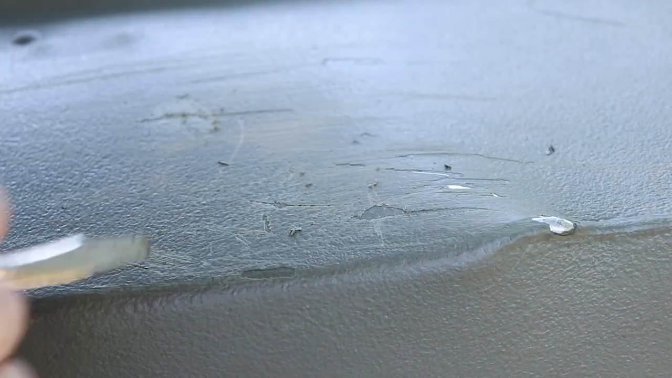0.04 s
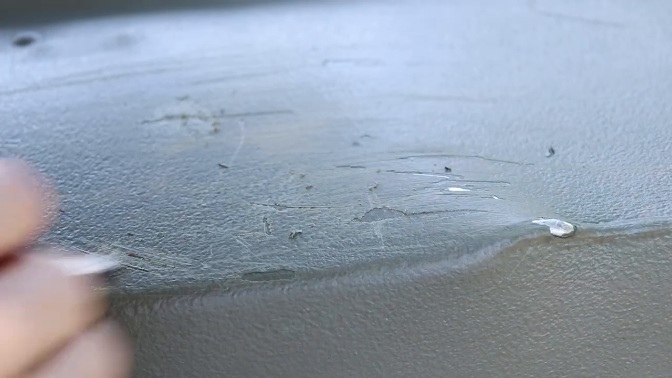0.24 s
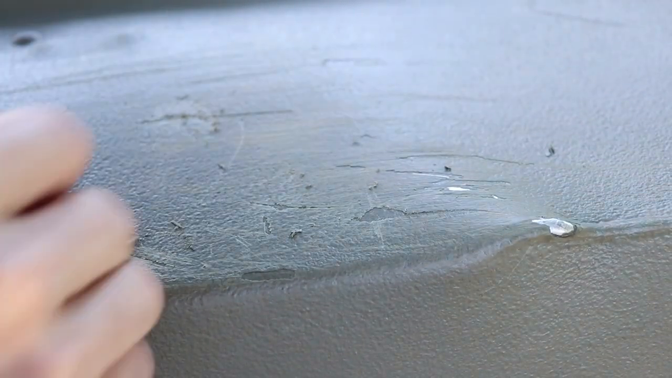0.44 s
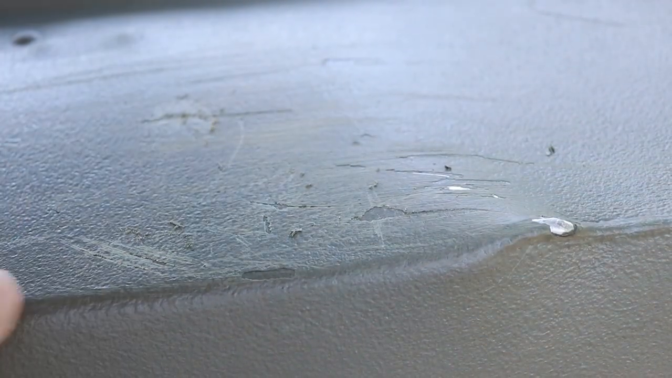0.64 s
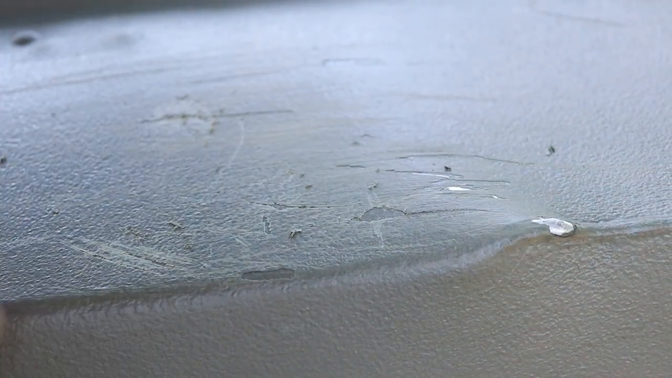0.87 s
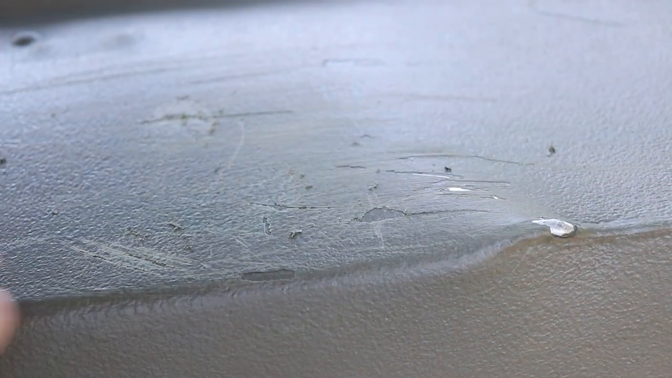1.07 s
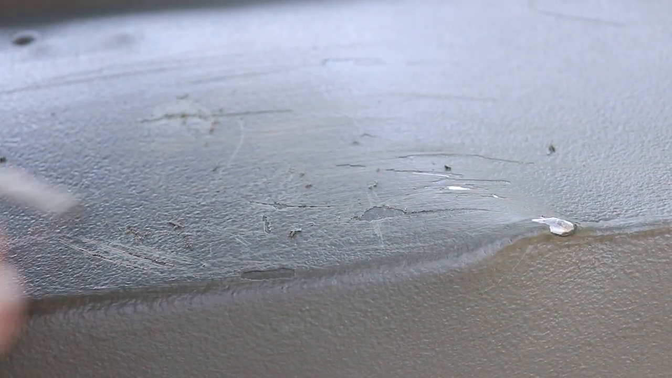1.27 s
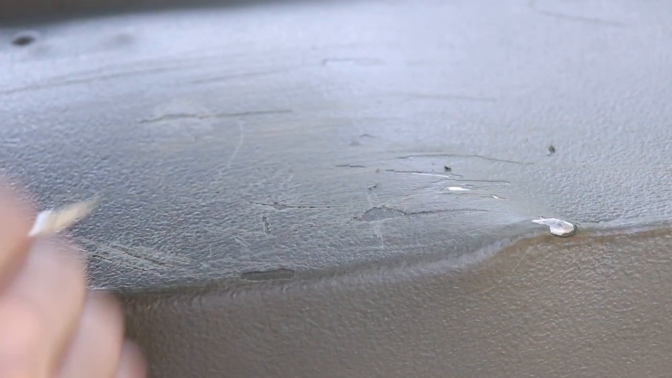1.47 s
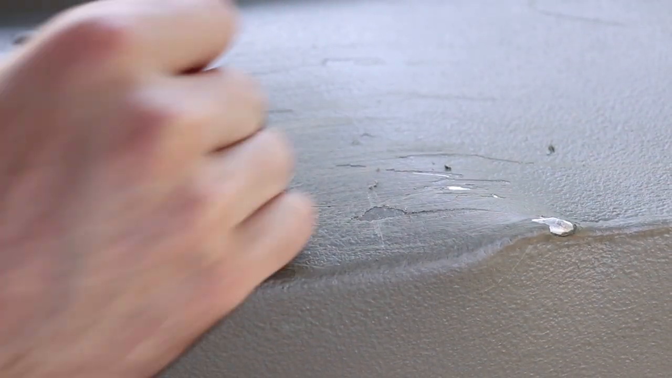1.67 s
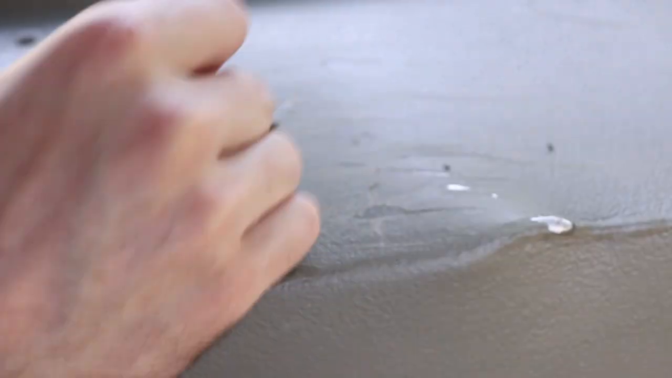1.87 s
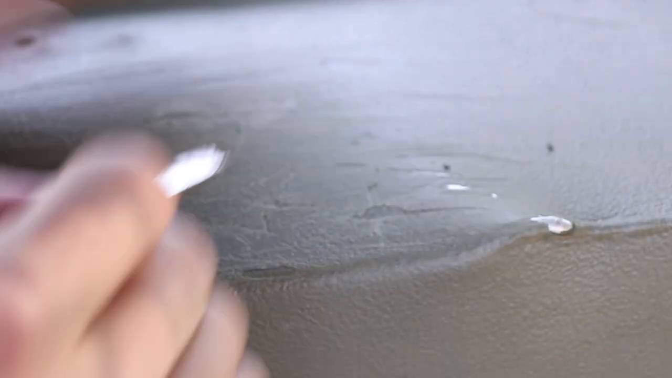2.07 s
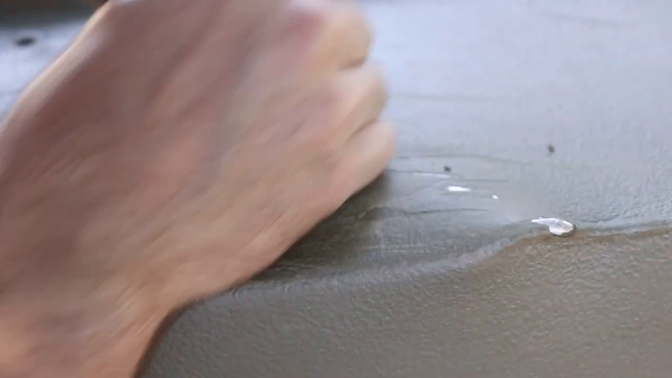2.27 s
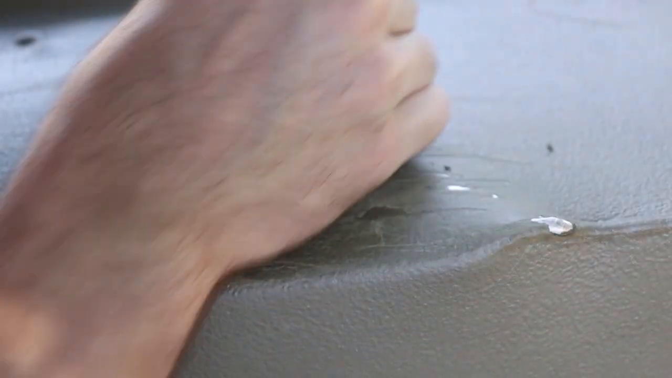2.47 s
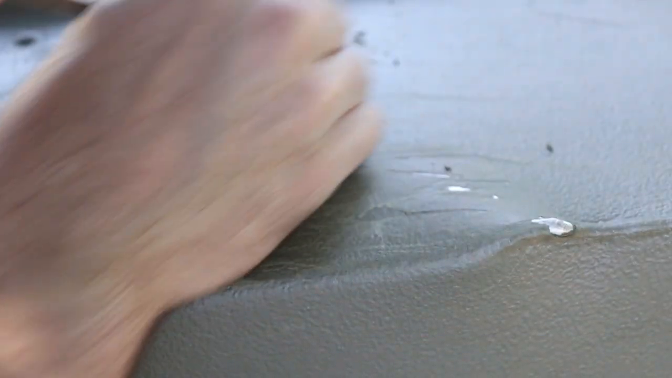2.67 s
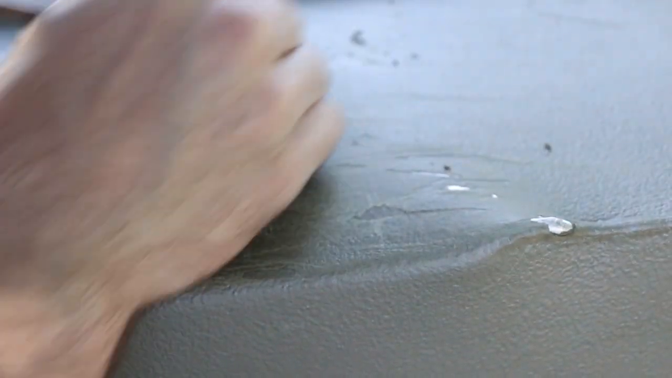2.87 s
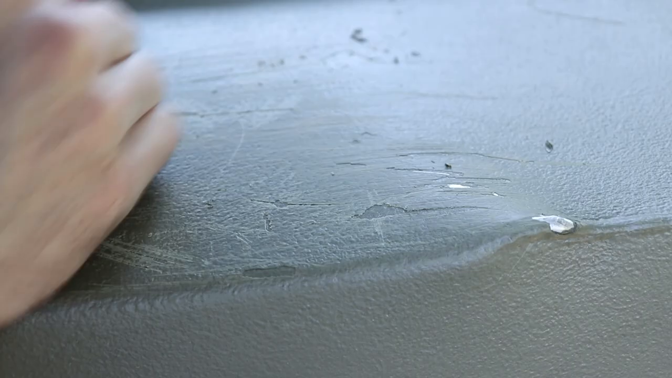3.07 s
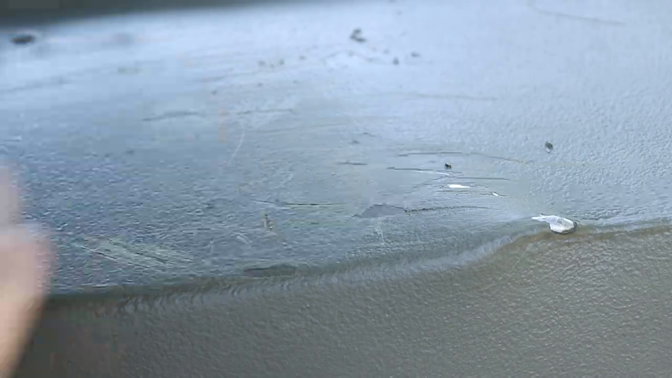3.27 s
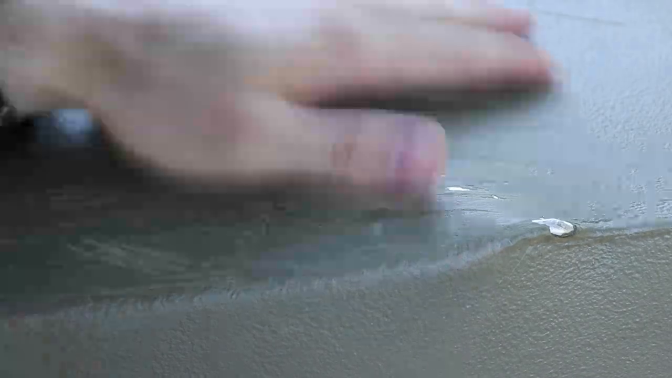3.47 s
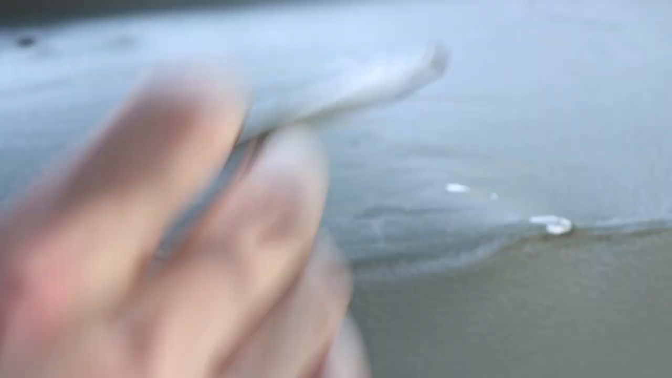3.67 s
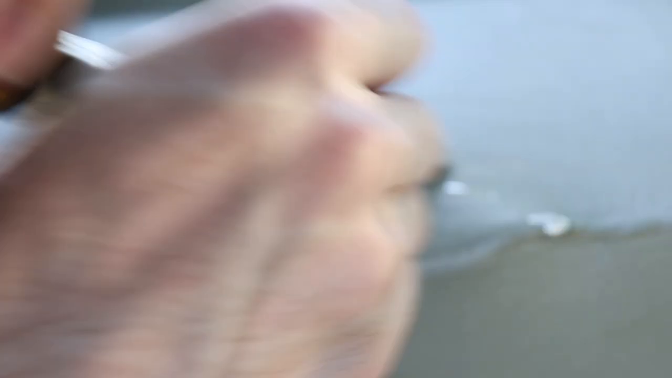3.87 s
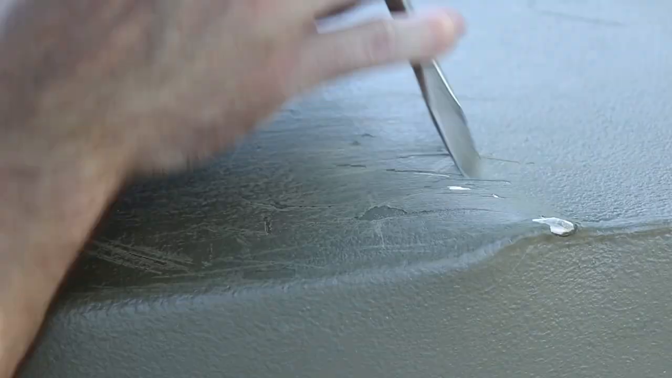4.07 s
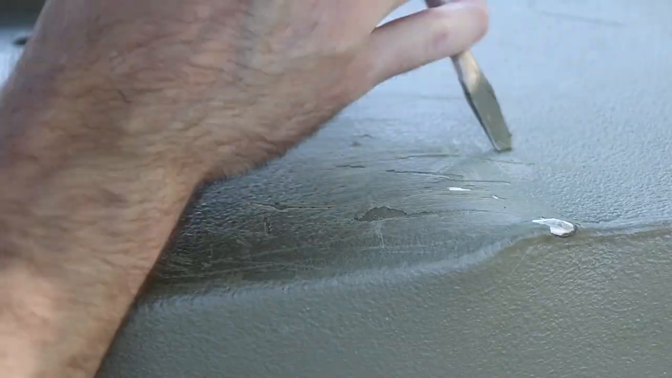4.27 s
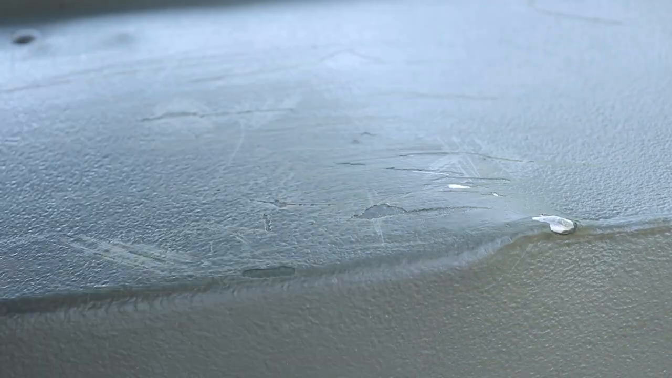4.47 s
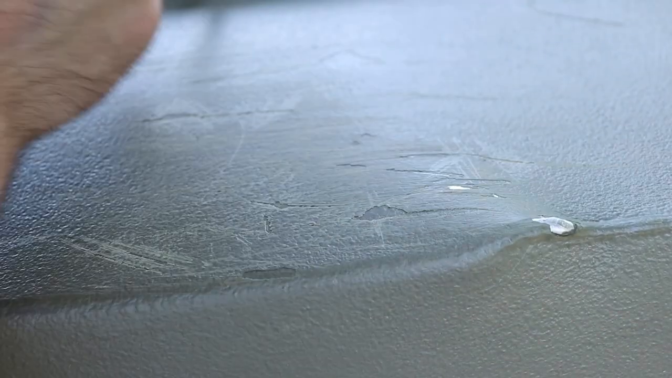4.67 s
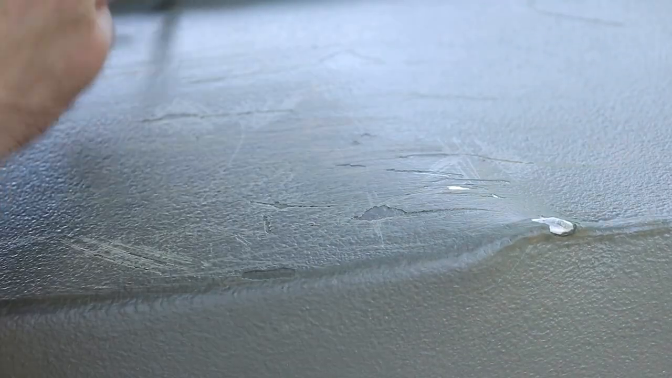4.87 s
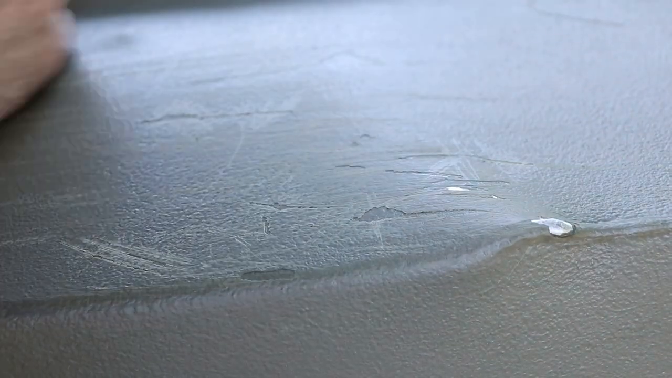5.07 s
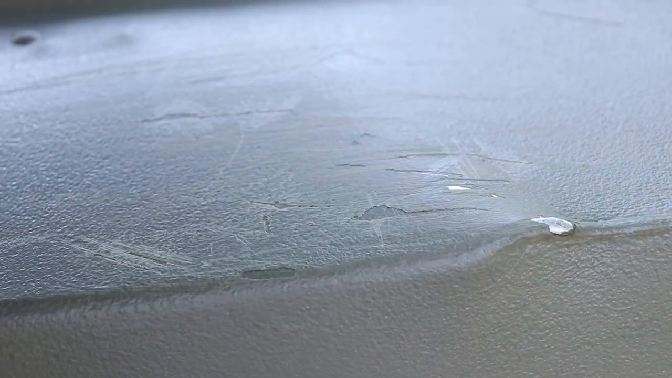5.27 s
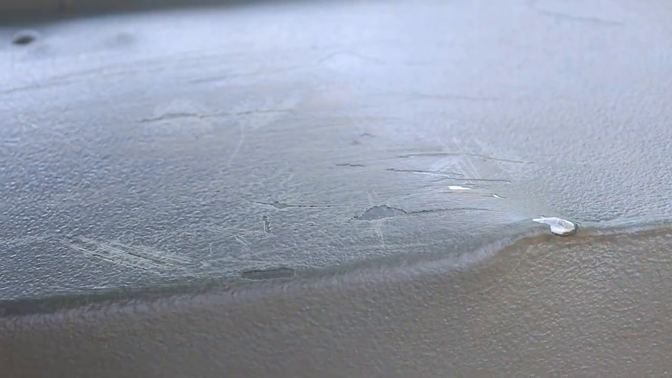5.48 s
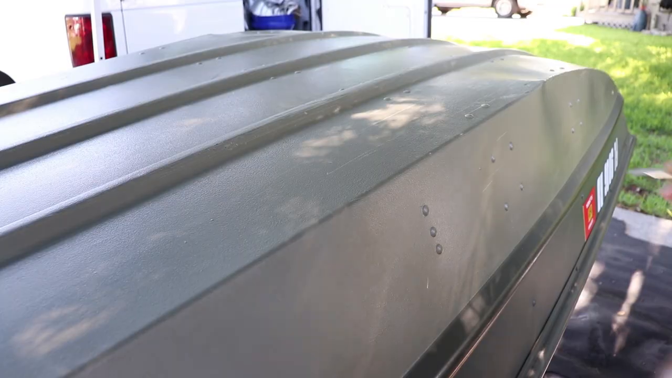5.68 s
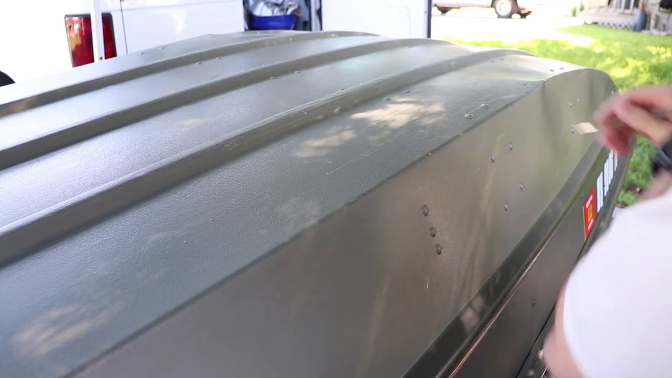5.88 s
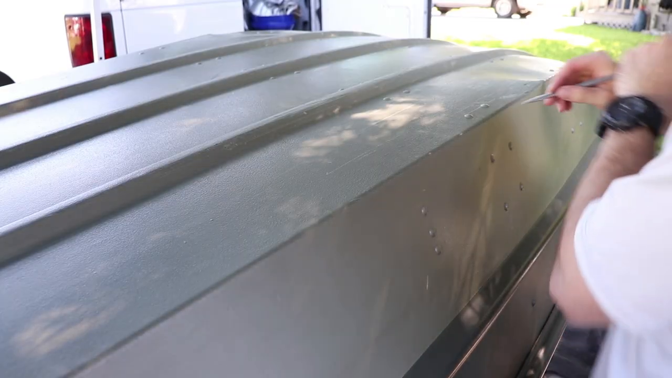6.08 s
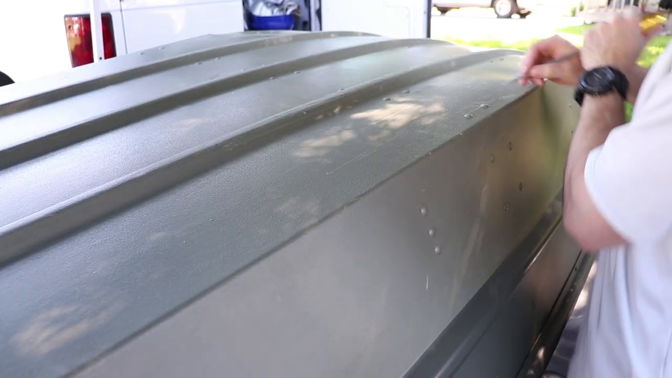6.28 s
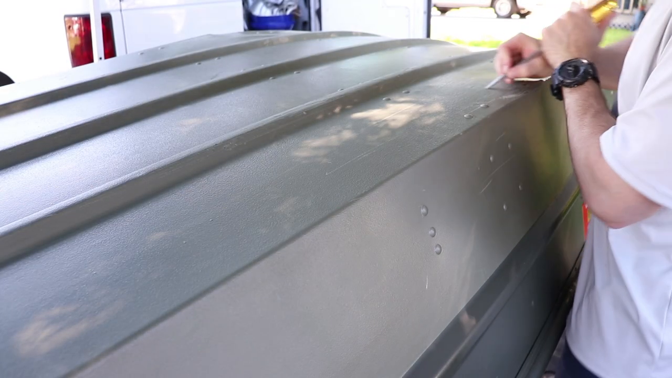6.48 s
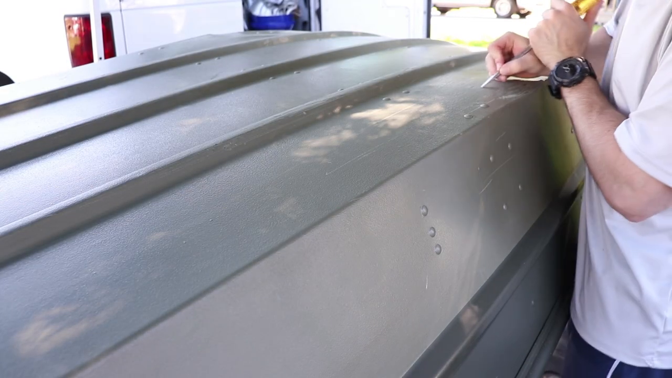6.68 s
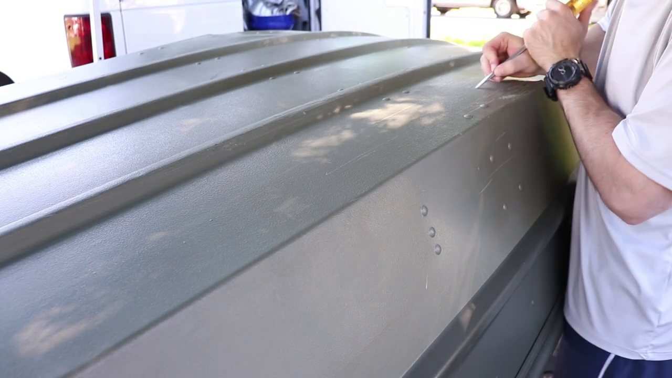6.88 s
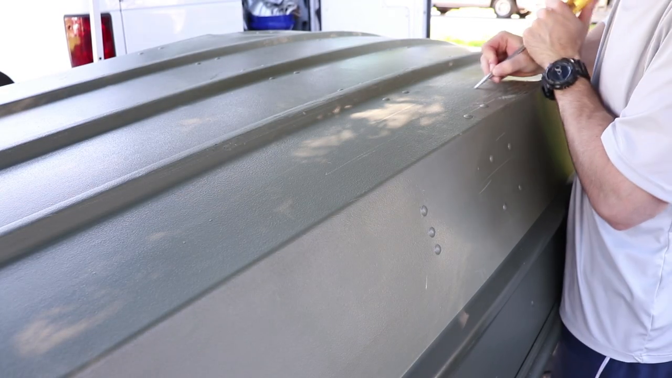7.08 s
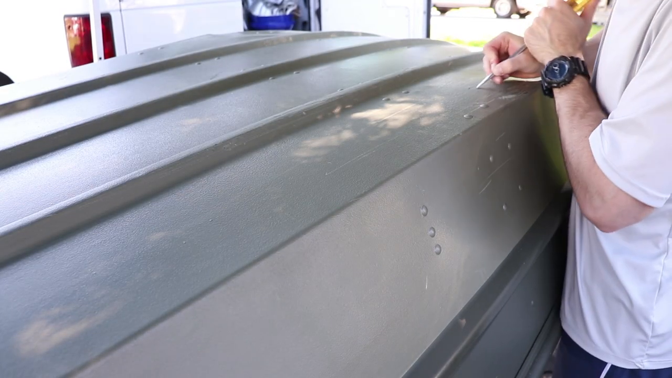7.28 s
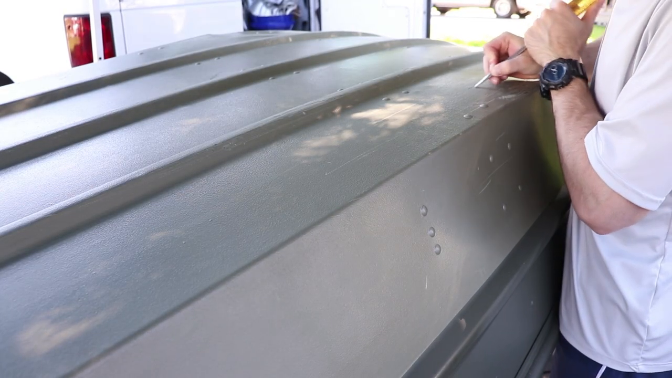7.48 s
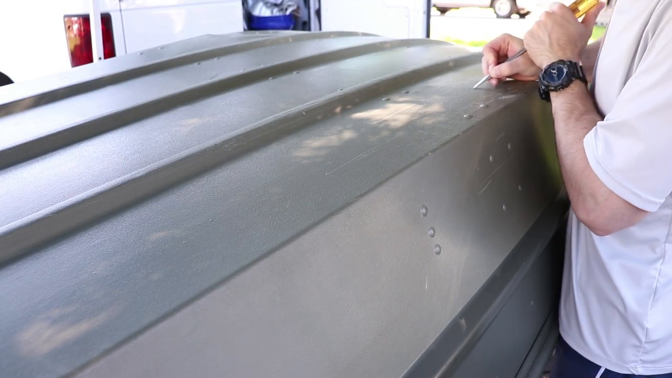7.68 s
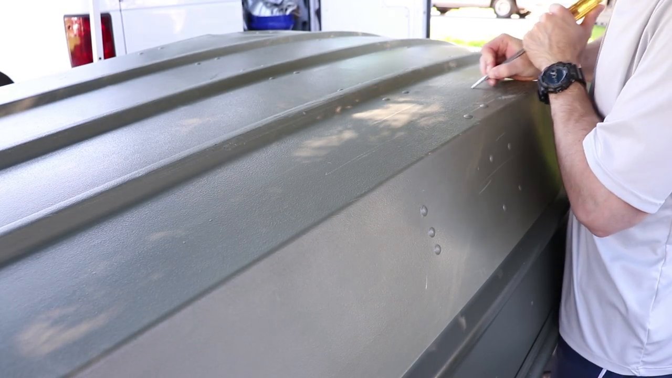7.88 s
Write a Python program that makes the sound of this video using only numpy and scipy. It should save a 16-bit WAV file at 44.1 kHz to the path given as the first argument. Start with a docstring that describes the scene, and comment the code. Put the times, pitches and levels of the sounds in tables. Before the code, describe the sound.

Close beside an upturned aluminium boat, a screwdriver blade gives a few light scrapes and rattles, pauses, then scrapes back and forth about five times a second, gritty with hollow thuds and snapping flakes. The view shifts to the far end: dry shuffles and clicks, a sharp knock, a long skating sweep, then strong booming strokes. Quiet outdoor air, a distant machine hum and faint birds lie behind, in mono.

```python
"""A flat screwdriver scrapes old coating off an upturned aluminium boat, back and forth about five times a second:
stick-slip noise at the tip drives the resonances of the thin hull. Thuds, landings and snapping flakes strike it too.
Heard first beside the spot, then, after shuffling and one long sweep, from the far end of the boat.
Behind it are dry handling noises (noise bursts with a yard echo), outdoor air (shaped noise), a distant machine
(wavering sines) and faint birds (blurred gliding sines)."""
import sys
import numpy as np
from scipy import signal
from scipy.fft import rfft, irfft
from scipy.io import wavfile

SR = 44100
rng = np.random.default_rng(int(sys.argv[2]) if len(sys.argv) > 2 else 0)


def transcribe(u):
    """Save the signal u as a 16-bit wav file named by the first command-line argument.

    u: samples, shape (n,) or (channels, n), limited to [-1, 1]; the rate is SR.
    q: integer samples, one column per channel.
    """
    v = np.clip(np.atleast_2d(u).T, -1, 1)
    q = np.round(v * 32767).astype(np.int16)
    wavfile.write(sys.argv[1], SR, q)


N = 350154  # length in samples

SIZE = 32768  # samples in one event or response
FREQ = np.maximum(np.arange(SIZE // 2 + 1) * SR / SIZE, 1)  # Hz
TIME = np.arange(SIZE) / SR  # s
SHIFT_S, MOVE_S = 1.85, 5.612  # the tip moves to a second patch; the listening place moves to the far end
# force spectrum of breaking flakes: [f/Hz, relative level/dB]
GRIT_SPECTRUM = [(200, -11), (1000, 9), (2800, 0.5), (4000, -1), (6000, -4), (8000, -3), (10500, -9),
                 (14000, -6.5), (16000, -15)]


def scraping():
    """Source and resonator: all strokes and blows excite the part of the hull that the tip is on."""
    # hull resonances at the first patch, the second patch and the far end:
    # [f/Hz, bandwidth/Hz, level over the plain sheet/dB]
    first_modes = [(155, 9, 16), (247.7, 29, 20), (351, 32, 8.5), (662, 66, 18), (764, 39, 15.5),
                   (950, 96, 2.5), (1454, 58, 13), (1605, 31, 10.5), (1820, 83, 8), (2220, 58, 7),
                   (2680, 320, 11.5), (3300, 90, -1), (5400, 850, 3.5), (7960, 900, 3)]
    near_modes = [(144.1, 3.9, 21.6), (244, 5.4, 20.3), (246, 38.5, 18.7), (293, 11, 0.33), (347, 40, 7.6),
                  (461, 145, 11.2), (533, 28, 3.5), (462.2, 8.1, 15.3), (632, 86, 14.3), (738.5, 16, 20.7),
                  (740, 6.3, 1), (930, 8.8, 0.98), (1196, 150, 5.4), (1350, 37, 2.8), (1449, 36, 9.2),
                  (1565, 48, 9.3), (1720, 270, 7.9), (1810, 31, 1.4), (2207, 49, 9.6), (2517, 93, 12),
                  (2780, 64, 13), (3270, 190, 7.4), (3480, 15, 6.9), (4540, 280, 3.8), (5700, 230, 9.3),
                  (7980, 900, 6.3), (9200, 220, 1.4)]
    far_modes = [(235, 21.5, 10), (352.6, 18, 9.1), (428, 22, 10.2), (640, 110, 10.6), (780, 46, 5.9),
                 (830, 23, 2.5), (917, 26, 7.9), (1130, 99, 5), (1390, 51, 4.1), (1680, 11, 2.9),
                 (1845, 25, 5.9), (2200, 44, 3.8), (2480, 100, 4.9), (2896, 80, 5), (3760, 950, 1.6),
                 (8570, 240, 9.1), (13600, 1100, 2.6)]
    # reverberant ring of the hull, beside the tool and at the far end: [f/Hz, T60/s, level over the first wave/dB]
    near_ring = [(129, 0.21, 5.5), (248, 0.65, -7), (696, 0.21, -1), (1800, 0.15, -3), (4780, 0.14, -9.5),
                 (12800, 0.042, -19)]
    far_ring = [(128, 0.5, 3.5), (252, 0.36, -4), (670, 0.32, -6.5), (1800, 0.17, -0.5), (4900, 0.25, -7),
                (13000, 0.047, -21)]
    first = hull(first_modes, near_ring)
    near = hull(near_modes, near_ring)
    far = hull(far_modes, far_ring)

    def body(s):
        """The transfer function of the hull depends on the place, hence on the time."""
        if s < SHIFT_S:
            return first
        return near if s < MOVE_S else far

    return to_and_fro(body) + chips(body) + catches(body) + taps(body)


def to_and_fro(body):
    """Reciprocating friction: each push is followed by a thinner return; now and then the blade skids freely."""
    # the hand's to and fro, one row per push and its return; about -40 dB is lifted clear:
    # [t of deepest bite/s, push length/s, push pressure/dB, return pressure/dB, push chatter f/Hz, return chatter f/Hz]
    stroke_rows = [(0.166, 0.1, -8, -20, 910, 1200), (0.333, 0.082, -6.5, -41, 1050, 1400),
                   (1.022, 0.11, -16, -19.5, 1200, 1490), (1.36, 0.13, -19, -15, 1410, 1400),
                   (1.589, 0.095, -10, -31, 1100, 1800), (1.767, 0.07, -20.5, -45, 1390, 1780),
                   (1.99, 0.047, -11.5, -17, 1200, 1990), (2.229, 0.095, 1, -9, 1000, 1290),
                   (2.442, 0.085, -1, -6, 910, 1070), (2.628, 0.065, -3, -18.5, 800, 1500),
                   (2.812, 0.036, 0, -16, 810, 1400), (3.01, 0.073, 2.5, -16, 755, 1300),
                   (3.239, 0.064, 1.5, -17, 780, 1400), (3.536, 0.047, -4, -11, 690, 1200),
                   (3.738, 0.097, -4.5, -11, 870, 1090), (3.945, 0.083, 0.5, -3.5, 750, 1120),
                   (4.183, 0.091, 1, 0, 726, 1010), (4.415, 0.1, 1.5, 2, 660, 930),
                   (4.617, 0.084, 5, 0, 530, 1020), (4.835, .105, 5, 3, 437, 920),
                   (5.052, 0.081, 5.5, -3, 510, 1000), (5.245, 0.092, 4.5, -3, 520, 1010),
                   (5.453, 0.073, 5, 2, 527, 835), (6.853, 0.099, 5.5, -8, 650, 1000),
                   (7.055, 0.089, 6.5, 1, 560, 940), (7.245, 0.073, 10, 1, 540, 950),
                   (7.447, 0.076, 9.5, -1.5, 545, 950), (7.655, .06, 13.5, 5.5, 505, 700),
                   (7.852, 0.08, 6, 5.5, 540, 757)]
    # free skids: the blade rattles after landing; later one long sweep digs in and skates on brighter:
    # [t of peak/s, lead-in/s, run-out/s, sheet flex level/dB, chatter level/dB, chatter f/Hz, grit level/dB]
    skid_rows = [(0.435, .012, 0.015, -45, -33.5, 1480, -50), (0.472, .012, 0.027, -45, -42, 1090, -52),
                 (0.532, .028, 0.033, -37, -33.5, 1300, -51.5), (6.68, 0.16, 0.19, -23, -21.5, 1000, -35.5),
                 (6.79, 0.24, 0.16, -38, -26, 1800, -46)]
    lead_share = 0.57  # part of a stroke before its deepest bite
    return_share = 0.53  # place of the return in the cycle
    return_fill, return_max_s = 0.8, 0.11  # share of the time left by the push that the return lasts; its limit
    jab_s, lift_s = 0.064, 0.07  # a shorter push is a jab; the tip then stays in the air this long
    cycle_s, rest_s = 0.18, 0.27  # the last to and fro before a rest; a longer gap is a rest
    return_cut_hz = 405  # the trailing tip hardly bends the sheet

    out = np.zeros(N)
    trailing = causal(1 / np.sqrt(1 + (return_cut_hz / FREQ) ** 4))
    gaps = np.diff([row[0] for row in stroke_rows], append=np.inf)
    for (s, push_s, push_db, return_db, push_hz, return_hz), gap in zip(stroke_rows, gaps):
        cycle = gap if gap < rest_s else cycle_s
        push = s, push_s, push_db, push_hz, False
        back_s = min(return_fill * (cycle - push_s), return_max_s)
        # the tip springs clear after a short jab and lands late
        lifted = lift_s + lead_share * back_s if push_s < jab_s else 0
        back_at = s + max(return_share * cycle, lifted)
        back = back_at, back_s, return_db, return_hz, True
        for at, length, press_db, hz, returning in (push, back):
            lead = lead_share * length
            sheet = pressed(body(at)) * (trailing if returning else 1)
            force = bite(at, press_db, hz, returning)
            add(out, at - lead, stroke(sheet, lead, length - lead, *force))
    for s, lead, trail, *force in skid_rows:
        add(out, s - lead, stroke(body(s), lead, trail, *force))
    return out


def bite(s, press_db, chatter_hz, returning):
    """Contact force: hand pressure and coating set a stroke's flex, chatter and grit levels; its pitch is given."""
    # old paint under the tip: [t/s, coated share (0 bare metal, 1 full coat)]
    paint_rows = [(0.15, 0.29), (0.55, 0.072), (1.0, 0.69), (2.4, 0.99), (2.65, 0.68), (3.0, 0.8),
                  (3.24, 1), (3.53, 0.2), (3.75, 0.78), (4.4, 0.66), (4.65, 0.51), (5.2, 0.043),
                  (5.5, 0.57), (7.05, 0.5), (7.9, 0.43)]
    paint = np.clip(np.interp(s, *np.transpose(paint_rows)), 0, 1)
    far = s > MOVE_S
    # starting levels in dB: a push at 0 dB pressure on bare metal, beside the tool
    flex_db, chatter_db, grit_db = -27.5, -27, -46.5
    # a full coat drags harder on the sheet, muffles the chatter and sheds more grit
    flex_db += press_db + 5 * paint
    chatter_db += press_db - 14.5 * paint
    grit_db += 0.79 * press_db + 9.5 * paint  # grit grows more slowly than pressure
    # the return stroke flexes the sheet less
    flex_db += -8 * returning
    chatter_db += -1 * returning
    # from the far end the boom carries best
    chatter_db += -4 * far
    grit_db += -4.5 * far
    return flex_db, chatter_db, chatter_hz, grit_db


def stroke(body, lead, trail, *force, flex_bite=1.6, chatter_bite=1.3, grit_bite=1.2):
    """Frictional excitation: grit follows the hand's speed, flex and chatter swell where the tip digs in."""
    length = lead + trail
    depth = travel(lead, trail)
    speed = np.sin(np.pi / 2 * depth)
    judder = stick_slip(length)
    flex, chatter, grit = contact(body, *force)
    slips = grains(2500, 2.76, 0.58)
    flakes = grains(4000, 2.1, 0.68)
    chattering = rfft(slips * judder * depth ** chatter_bite) * causal(chatter)
    grinding = rfft(flakes * judder * speed ** grit_bite) * causal(grit)
    # the hand holds the tip down, so the sheet's swing follows the depth of the cut
    # and keeps an even strength while its phase wanders
    analytic = signal.hilbert(irfft(rfft(slips) * causal(flex)))
    strength = np.sqrt(np.mean(np.abs(analytic) ** 2))
    swing = np.cos(np.angle(analytic)) * strength * depth ** flex_bite
    # the swing is kept between about 85 and 650 Hz
    band = 1 / np.sqrt((1 + (FREQ / 650) ** 8) * (1 + (85 / FREQ) ** 4))
    sheet = rfft(swing) * causal(band)
    return irfft((sheet + slide(chattering + grinding, length)) * body * undb(0.71))


def travel(lead, trail):
    """Kinematic envelope: rises from 0 to 1 at the deepest bite and falls back to 0."""
    return np.interp(TIME, [0, lead, lead + trail], [0, 1, 0])


def stick_slip(length, slow_hz=200, sweep_s=0.22, uneven=0.55, spread_db=4, release_s=0.0044, creep=0.57):
    """Stick-slip: the tip breaks free at uneven intervals, more finely in a long fast sweep; rms 1."""
    gaps, sizes = rng.standard_normal((2, SIZE // 32))
    slip_hz = slow_hz * (1 + (length / sweep_s) ** 2)
    at = np.cumsum(np.exp(uneven * gaps)) * SR / slip_hz
    kick_sizes = undb(spread_db * np.clip(sizes, -2, 2))
    kicks = np.bincount(at.astype(int), kick_sizes, SIZE)[:SIZE]
    releases = signal.lfilter([1], [1, -np.exp(-1 / (release_s * SR))], kicks)
    return unit(creep + unit(releases))


def grains(rate, spread_db, smooth):
    """Granular noise: tiny slips of very uneven size (rate per second) over a smooth rub; rms 1."""
    sizes = undb(spread_db * np.minimum(rng.exponential(size=SIZE), 4))
    slips = (rng.random(SIZE) < rate / SR) * sizes * rng.choice([-1, 1], SIZE)
    return unit(unit(slips) + smooth * rng.standard_normal(SIZE))


def contact(body, flex_db, chatter_db, chatter_hz, grit_db, thud=1):
    """Contact force spectra: the sheet gives, the blade chatters, the coating cracks."""
    # force spectrum of the flexing sheet: [f/Hz, relative level/dB]
    flex_spectrum = [(30, -42.5), (60, -11.5), (100, -26.5), (145, -13), (210, -1), (300, -1.5),
                     (420, -6.5), (600, -19.5), (1200, -22.5), (4000, -82)]
    flex = through(undb(along(flex_spectrum, FREQ)) * thud, body, flex_db)
    chatter = through(bump(chatter_hz, 0.88, 2.07), body, chatter_db)
    grit = through(undb(along(GRIT_SPECTRUM, FREQ)), body, grit_db)
    return flex, chatter, grit


def slide(edge, length):
    """Moving source: the tip passes from one spot to the next, and its colour changes on the way."""
    turn = np.pi / 2 * np.clip(TIME / length, 0, 1)
    shares = np.cos(turn) ** 2, np.sin(turn) ** 2
    return rfft(sum(share * irfft(edge * spot(length)) for share in shares))


def spot(length, rib_db=-4.0, blur_s=0.24):
    """Interference: bending waves bounce off two nearby ribs; a long stroke averages the colouring out."""
    delays = rng.uniform(0.0008, 0.004, 2)  # s, group delay at 1 kHz; the lows arrive later
    echoes = sum(np.exp(-4j * np.pi * delay * np.sqrt(1000 * FREQ)) for delay in delays)
    return 1 + undb(rib_db) / (1 + (length / blur_s) ** 2) * echoes * FREQ / (FREQ + 700)


def catches(body, thud_width=0.47, thud_slope=0.88):
    """Impulsive arrest: the tip thuds at the spot's pitch, with more chatter and clank the more abruptly it stops."""
    # the tip thuds on the sheet, mostly as it catches near a push:
    # [t/s, thud level/dB, abruptness (0 to 1), chipping paint level/dB, thud f/Hz]
    thud_rows = [(0.169, -36.5, .8, -56, 300), (0.321, -33.5, .8, -47, 280), (0.944, -28.5, .5, -69, 260),
                 (1.883, -41, 0.9, -48.5, 280), (2.202, -24.5, 0.4, -42, 296), (2.436, -28, 1, -31, 330),
                 (2.625, -24, 0.89, -54, 273), (2.823, -18, 0.75, -40, 438), (3.016, -21.5, 0.73, -42, 330),
                 (3.231, -30, 0, -43, 254), (3.374, -23.5, 0, -42.5, 330), (3.5227, -26.5, 0.6, -48, 280),
                 (3.530, -20, 0.88, -27.5, 300), (3.726, -22, 0, -50, 243), (3.937, -27, 0.1, -32.5, 292),
                 (4.423, -26.5, .1, -38.5, 280), (4.803, -28, 0.8, -60, 400), (5.032, -24.5, 0.2, -38, 480),
                 (5.228, -33, 1, -39, 456), (5.251, -26.5, 0.7, -58, 500), (5.455, -26, 0.98, -31, 453),
                 (7.047, -21, 0.23, -60, 285), (7.236, -18, 0.9, -26, 280), (7.244, -19, 0.25, -23.5, 230),
                 (7.426, -26, 0.76, -54, 450), (7.452, -15.5, 0.94, -49, 300),
                 (7.628, -20.5, 0.98, -49, 360), (7.642, -12, 0.82, -35, 404), (7.742, -27.5, 1, -50, 400),
                 (7.833, -22, 0.89, -46, 286)]
    near_hz, far_hz = 467, 600  # chatter pitch of a thud, beside the tool and at the far end
    clank_db, soft_db = -40, -32  # clank of an abrupt stop; loss of chatter and clank in a soft one
    out = np.zeros(N)
    for s, db, abrupt, chip_db, thud_hz in thud_rows:
        edge_db = db + soft_db * (1 - abrupt)
        hz = near_hz if s < MOVE_S else far_hz
        thud = bump(thud_hz, thud_width, thud_slope)
        blow = knock(pressed(body(s)), db, edge_db, hz, chip_db, thud)
        add(out, s, blow + clank(edge_db + clank_db))
    return out


def taps(body):
    """Impact and damping: the more freely the landing blade bounces, the less it chatters and the more it rings."""
    # the blade lands on the hull: [t/s, blow level/dB, freedom to ring (0 to 1), chipping paint level/dB]
    landing_rows = [(0.4229, -31, 0, -34.5), (.432, -32, 0.1, -48), (.510, -35.5, 0.2, -44),
                    (0.528, -35, 0.4, -50), (.943, -32.5, 0.16, -57), (2.334, -36.5, 0.25, -42),
                    (3.64, -30.5, 1, -26.5), (3.842, -38, 0.8, -42), (4.28, -33.5, 0.95, -41),
                    (4.75, -33, 0, -60), (5.138, -30.5, 0, -59), (5.338, -27, 0, -32),
                    (6.4843, -14, 0.16, -15.5), (6.681, -18.5, 0, -43), (7.7477, -18.5, 0.2, -26)]
    tap_hz = 1160
    held_flex_db, held_clank_db = -3.5, -6.5  # with the blade held firmly
    free_flex_db, free_chatter_db, free_clank_db = 2, -3.5, 11  # change when it bounces freely
    out = np.zeros(N)
    for s, db, free, chip_db in landing_rows:
        flex_db = db + held_flex_db + free_flex_db * free
        chatter_db = db + free_chatter_db * free
        blow = knock(pressed(body(s)), flex_db, chatter_db, tap_hz, chip_db)
        add(out, s, blow + clank(db + held_clank_db + free_clank_db * free))
    return out


def chips(body):
    """Brittle fracture: a flake snaps off with a bright tick that crumbles away within milliseconds."""
    # flakes of paint snap off: [t/s, level/dB, crumbling time constant/s]
    chip_rows = [(1.9708, -41, 0.0091), (1.99, -37, 0.0032), (2.187, -40, .005), (2.203, -26.5, 0.0078),
                 (2.241, -45, .01), (2.332, -32.5, .003), (2.415, -33, 0.0064), (2.4512, -36, 0.0051),
                 (2.6323, -38, 0.0041), (2.8, -35, 0.0088), (3.013, -30, 0.0038), (3.22, -35, 0.0056),
                 (4.17, -35, 0.0044), (4.592, -41, .004), (6.896, -36, 0.0044)]
    chip_hz = 8500  # a clean snap is brighter than the grinding
    out = np.zeros(N)
    for s, db, crumble_s in chip_rows:
        sheet = pressed(body(s))
        snap = grains(6000, 4.9, 0.8) * np.exp(-TIME / crumble_s)
        colour = bump(chip_hz, 1.45, 1.24) * undb(along(GRIT_SPECTRUM, FREQ))
        force = causal(through(colour, sheet, db))
        add(out, s, irfft(rfft(snap) * force * sheet))
    return out


def knock(body, *force, skid_s=0.003, skid_db=-2, skid_hz=900, spread=0.06):
    """Dispersive impact: one push on the sheet and a skid of a few milliseconds, scaled for a 10 ms blow."""
    envelope = np.exp(-TIME / skid_s) * (1 - np.exp(-TIME / 0.0003))
    skid = rfft(unit(rng.standard_normal(SIZE) * envelope)) / np.sqrt(SIZE)
    push = 1 / (1 + 1j * FREQ / skid_hz)  # the push holds the lows, the skid the highs
    gain = np.sqrt(sum(part ** 2 for part in contact(body, *force)))
    dispersion = np.exp(-2j * np.pi * spread * np.sqrt(FREQ))  # low bending waves travel slower
    blow = push + undb(skid_db) * skid * (1 - push)
    return irfft(blow * causal(gain) * dispersion * body) * np.sqrt(SR / 100) * undb(3.5)


def clank(db, detune=0.0098):
    """Modal ringing: blade and plate sound as decaying sines, a little differently each time; level of the first 10 ms."""
    # blade and plate ringing together: [f/Hz, relative level/dB, T60/s]
    clank_modes = [(760, -8.5, 0.39), (881, 4, 0.096), (942, -3.5, 0.2), (1500, -18, 0.2), (1612, 0.5, 0.1),
                   (1690, -5.5, 0.22), (1862, -6.5, 0.14), (2050, -11.5, 0.095), (2670, -8, 0.11),
                   (4300, -4.5, 0.054), (4970, -7, 0.025), (6000, -11, 0.059)]
    chance = rng.standard_normal((len(clank_modes), 2))
    ring = np.zeros(SIZE)
    for (hz, mode_db, t60), (pitch_shift, phase) in zip(clank_modes, chance):
        decay = np.exp(-np.log(1000) * TIME / t60)
        ring += undb(mode_db) * decay * np.sin(2 * np.pi * (hz * (1 + detune * pitch_shift) * TIME + phase))
    ring = ring * (1 - np.exp(-TIME / 0.00032))
    return ring * undb(db) / np.sqrt(np.mean(ring[:SR // 100] ** 2))


def pressed(body, detune=0.0094, treble_detune=0.0505, treble_hz=3000):
    """Loading of a plate: the leaning hand detunes its resonances each time, the high ones most."""
    shift = detune + treble_detune * FREQ ** 2 / (FREQ ** 2 + treble_hz ** 2)
    return np.interp(FREQ * np.exp(shift * rng.uniform(-1, 1)), FREQ, body)


def hull(modes, ring, return_s=0.0405, return_db=0, return_hz=146):
    """Plate transfer function: first wave, dense ring, a late bass return, and the main resonances."""
    ring = np.array(ring)
    centres = np.geomspace(100, 12800, num=8)
    response = np.ones(len(FREQ), complex)
    for hz, share in zip(centres, np.eye(len(centres))):
        t60 = along(ring[:, :2], hz)
        tail = rng.standard_normal(SIZE) * np.exp(-np.log(1000) * TIME / t60)
        band = np.interp(np.log(FREQ), np.log(centres), share)
        band_filter = causal(np.sqrt(band) + 0.0018)
        response += rfft(unit(tail)) / np.sqrt(SIZE) * band_filter * undb(along(ring[:, ::2], hz))
    # slow bending waves come back from the ends of the boat
    delay = np.exp(-2j * np.pi * FREQ * return_s)
    response += undb(return_db) * causal(bump(return_hz, 0.06, 11.4)) * delay
    resonances = sum((undb(db) - 1) / (1 + 1j * (FREQ ** 2 - hz ** 2) / (FREQ * width))
                     for hz, width, db in modes)
    return response * (1 + resonances)


def handling(yard_t60=0.33, yard_db=-9):
    """Direct and reverberant sound: crackly shuffles and dry clicks off the hull, with a short yard echo."""
    # shuffling about beside the boat: [t of peak/s, lead-in/s, run-out/s, relative level/dB, f/Hz]
    shuffle_rows = [(5.635, 0.031, 0.057, -38.5, 1980), (5.744, 0.046, 0.03, -43, 2370),
                    (6.191, 0.091, 0.084, -35, 1890), (6.308, 0.048, 0.029, -39.5, 1260),
                    (6.417, 0.059, 0.064, -38, 2380)]
    # dry handling clicks: [t/s, relative level/dB, main f/Hz, second f/Hz, second level relative to main/dB]
    click_rows = [(5.642, -24, 950, 1250, -12), (5.741, -41, 1540, 2900, -9),
                  (6.118, -38.5, 1340, 2100, -15), (6.148, -30.5, 1550, 4880, -5),
                  (6.229, -33, 3600, 1490, 3), (6.289, -25.5, 1260, 2100, -13), (6.314, -32, 710, 1160, -7),
                  (6.412, -24.5, 2270, 1340, -6), (7.034, -39.5, 2970, 4880, -15)]
    out = np.zeros(N)
    echo = unit(rng.standard_normal(SIZE) * np.exp(-np.log(1000) * TIME / yard_t60)) / np.sqrt(SIZE)
    yard = 1 + undb(yard_db) * rfft(echo)
    for s, lead, trail, db, hz in shuffle_rows:
        rustle = grains(2200, 4.2, 0.58) * travel(lead, trail) ** 0.96
        colour = causal(through(bump(hz, 1.8, 3.36), yard, db))
        add(out, s - lead, irfft(rfft(rustle) * yard * colour))
    for s, db, hz, second_hz, second_db in click_rows:
        colour = np.hypot(bump(hz, 0.27, 1.8), undb(second_db) * bump(second_hz, 0.1, 1.6))
        burst = unit(rng.standard_normal(SIZE) * np.exp(-TIME / 0.0028))
        rattle = 1 + 0.8 * rfft(burst) / np.sqrt(SIZE)
        click = irfft(rattle * yard * causal(through(colour, yard, db - 2.0)))
        add(out, s, click * np.sqrt(SR / 100))
    return out


def background(near_hum_db=-3, far_hum_db=-2):
    """Ambient sound field: air and machine hum, louder out in the open at the far end, and blurred bird whistles."""
    # spectrum of the yard air beside the tool and at the far end: [f/Hz, relative level per Hz/dB]
    near_air = [(15, -34), (25, 0.5), (427, -1.5), (516, 0.5), (575, -4.5), (1890, -13), (2410, -12.5),
                (3160, -16.5), (4370, -20.5), (7510, -22), (10100, -25.5), (16000, -26.5)]
    far_air = [(15, -42), (25, -3), (120, -6.5), (223, -5.5), (405, -6), (439, -10), (503, 0.5), (545, -6),
               (1160, -11.5), (1650, -16), (4030, -19.5), (5730, -26), (16000, -32)]
    # tones of a distant machine in the two places: [f/Hz, relative level/dB]
    near_lines = [(511.4, -62.5), (651.4, -94), (958.2, -75)]
    far_lines = [(118.4, -54), (506.0, -53), (651.4, -75), (1125, -57.5), (1184, -69)]
    # faint far birds: [t/s, length/s, start f/Hz, end f/Hz, relative level/dB]
    bird_rows = [(0.583, 0.27, 4400, 4190, -61), (2.713, 0.07, 3380, 2900, -54),
                 (5.78, 0.09, 2870, 2740, -51), (5.89, 0.11, 4500, 5150, -58),
                 (5.916, 0.26, 3960, 3720, -58.5)]
    moved = np.clip((np.arange(N) / SR - MOVE_S) * 200, 0, 1)  # crossfade in 5 ms
    near = air(near_air, -54.5) + undb(near_hum_db) * hum(near_lines)
    far = air(far_air, -45.5) + undb(far_hum_db) * hum(far_lines)
    out = (1 - moved) * near + moved * far
    for s, length, start_hz, end_hz, db in bird_rows:
        glide = np.interp(TIME, [0, length], [start_hz, end_hz])
        hz = glide * (1 + 0.069 * walk(2000, SIZE) + 0.0147 * walk(39.2, SIZE))
        swell = np.sqrt(2 * travel(length / 3, length * 2 / 3))
        add(out, s, undb(db) * swell * np.sin(2 * np.pi * np.cumsum(hz) / SR))
    return out


def air(spectrum, db):
    """Broadband noise: outdoor air with a shaped spectrum that swells a little."""
    hz = np.maximum(np.arange(N // 2 + 1) * SR / N, 1)
    noise = irfft(rfft(rng.standard_normal(N)) * undb(along(spectrum, hz)), N)
    return unit(noise) * undb(db + 1.5 * walk(5, N))


def hum(lines):
    """Line spectrum: tones of a distant machine, wavering slightly in level and pitch."""
    out = np.zeros(N)
    for hz, db in lines:
        level = undb(db + 0.43 * walk(2.0, N)) * np.sqrt(2)
        pitch = hz * (1 + 0.0029 * walk(6.9, N))
        out += level * np.sin(2 * np.pi * np.cumsum(pitch) / SR)
    return out


def bump(hz, half_width, slope):
    """Broad resonance curve with straight skirts; the half-width is a share of the centre."""
    return (1 + (np.sinh(np.log(FREQ / hz)) / half_width) ** 2) ** (-slope / 2)


def through(shape, body, db):
    """Source-filter scaling: size a force spectrum so that unit noise leaves the body at this level."""
    return shape * undb(db) / np.sqrt(np.mean(np.abs(shape * body) ** 2))


def causal(gain):
    """Minimum-phase response with this gain, by folding the cepstrum: sharp attack, then decay."""
    cepstrum = irfft(np.log(gain + 1e-9))
    cepstrum[1:SIZE // 2] *= 2
    cepstrum[SIZE // 2 + 1:] = 0
    return np.exp(rfft(cepstrum))


def along(points, hz):
    """Interpolation of (Hz, value) points on a log-frequency axis."""
    points = np.asarray(points, float)
    return np.interp(np.log(hz), np.log(points[:, 0]), points[:, 1])


def walk(rate, size):
    """Random modulation: normal values, this many per second, joined by straight lines."""
    steps = np.arange(size) * rate / SR
    knots = rng.standard_normal(size // 8)
    return np.interp(steps, np.arange(len(knots)), knots)


def undb(db):
    """Logarithmic level: decibels to amplitude gain."""
    return 10 ** (np.asarray(db) / 20)


def unit(x):
    """Effective value: scale to rms 1."""
    return x / np.sqrt(np.mean(x ** 2))


def add(track, start_s, sound):
    """Superposition: mix a sound in at its time."""
    i = max(int(start_s * SR), 0)
    part = sound[:max(N - i, 0)]
    track[i:i + len(part)] += part


def scene():
    """Superposition of tool on hull, handling and yard, in mono."""
    return (scraping() + handling() + background())[None]


def record(dry):
    """Saturation and band limit: clip at full scale, then cut the top above 16 kHz."""
    low_pass = signal.ellip(8, 0.2, 70, 16000, fs=SR, output="sos")
    return signal.sosfilt(low_pass, np.clip(dry, -1, 1))


dry = scene()
out = record(dry)
transcribe(out)
```